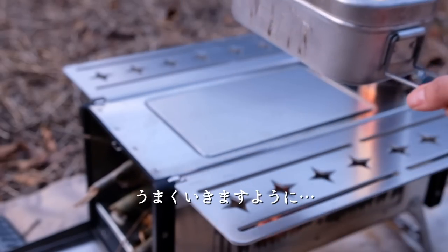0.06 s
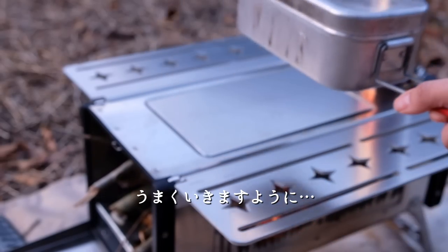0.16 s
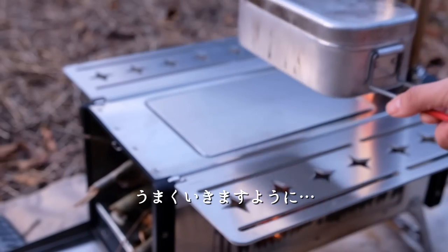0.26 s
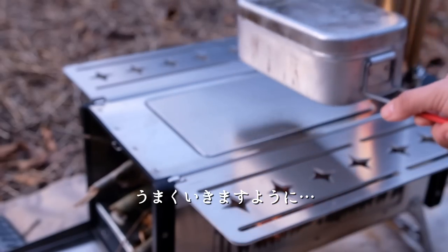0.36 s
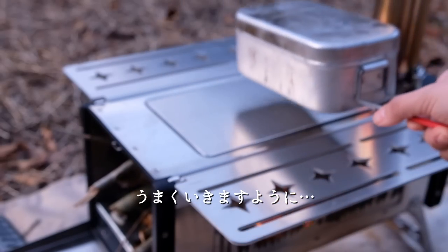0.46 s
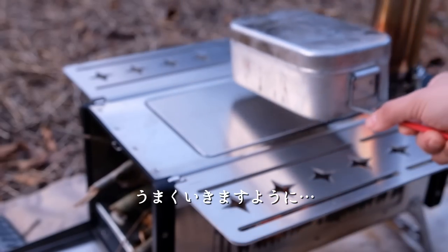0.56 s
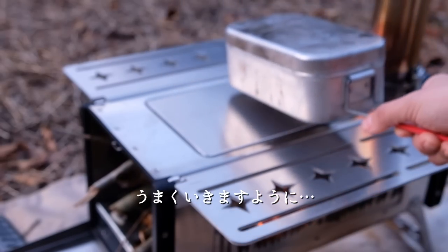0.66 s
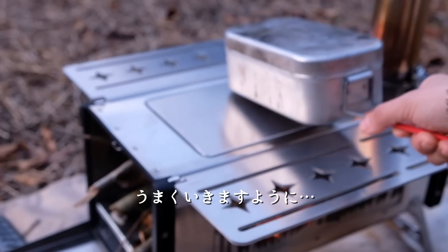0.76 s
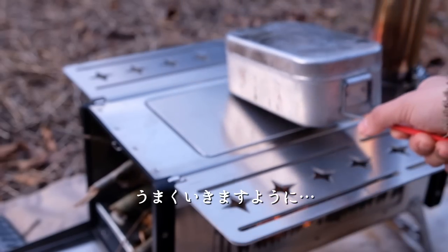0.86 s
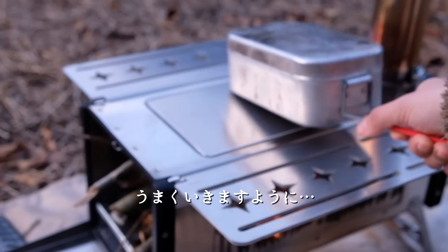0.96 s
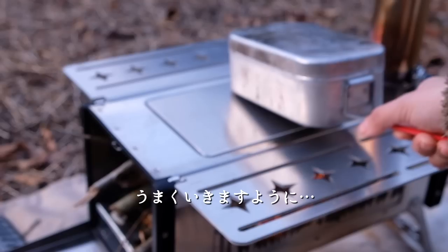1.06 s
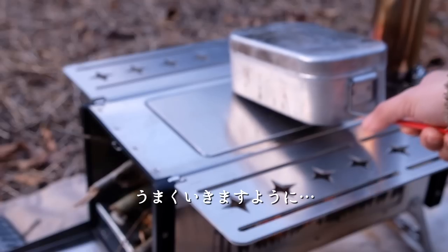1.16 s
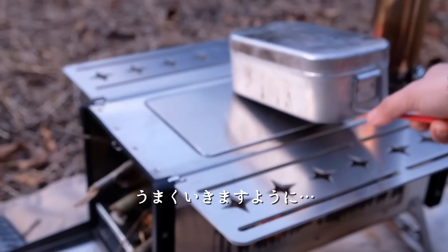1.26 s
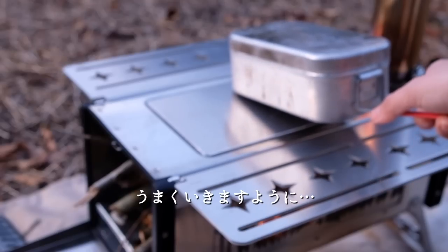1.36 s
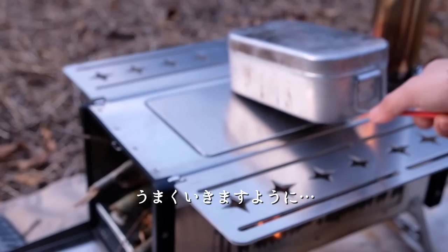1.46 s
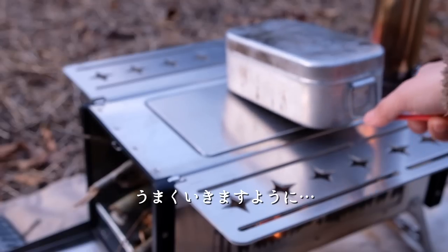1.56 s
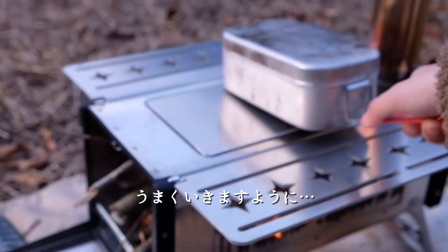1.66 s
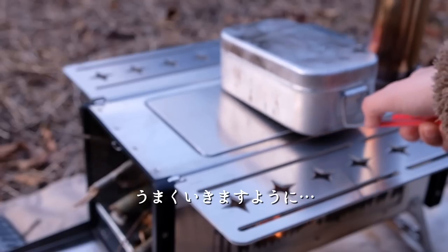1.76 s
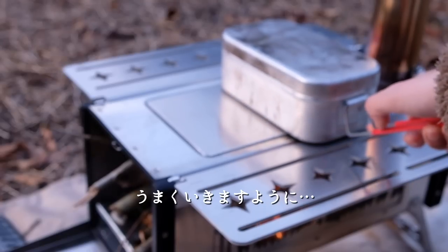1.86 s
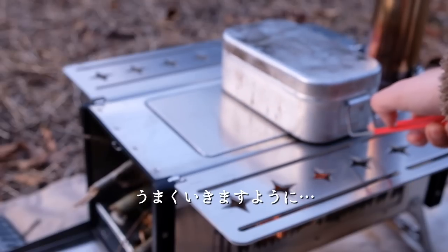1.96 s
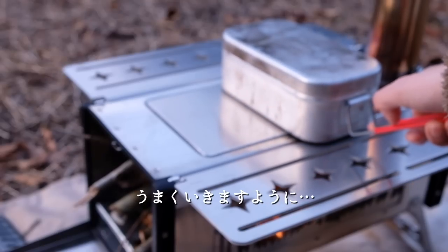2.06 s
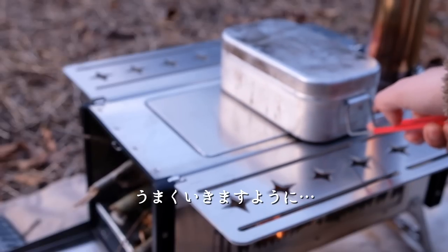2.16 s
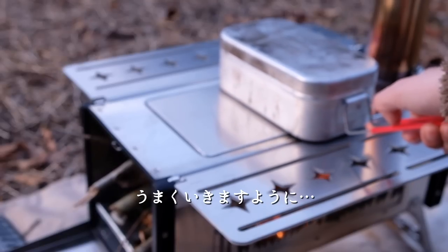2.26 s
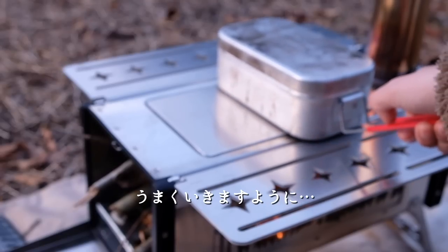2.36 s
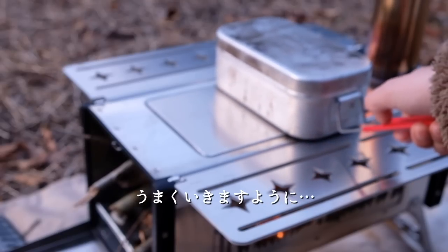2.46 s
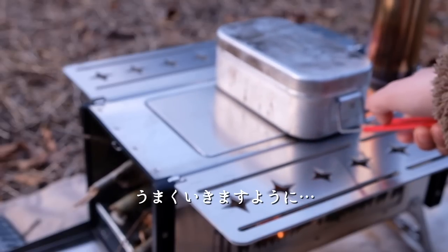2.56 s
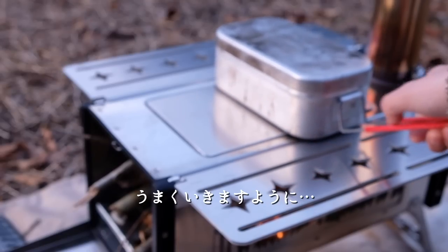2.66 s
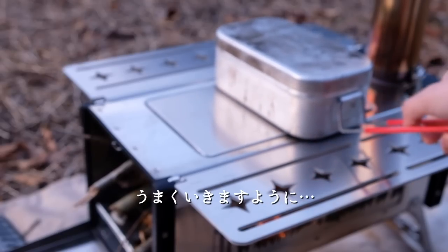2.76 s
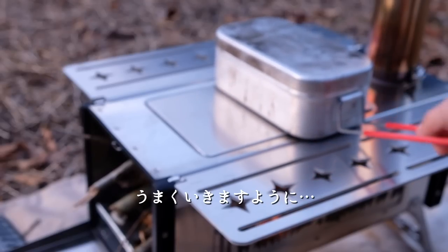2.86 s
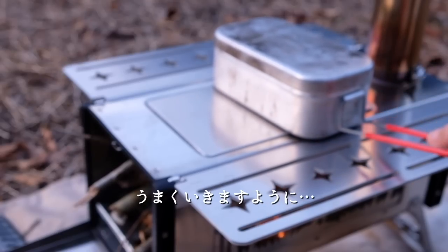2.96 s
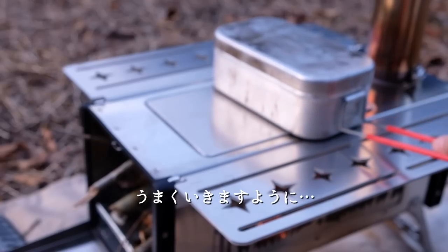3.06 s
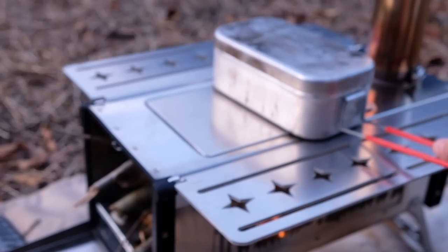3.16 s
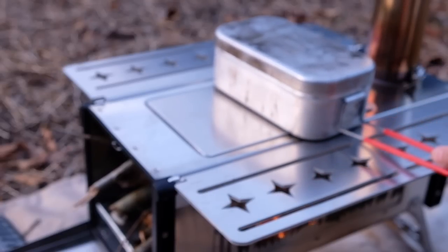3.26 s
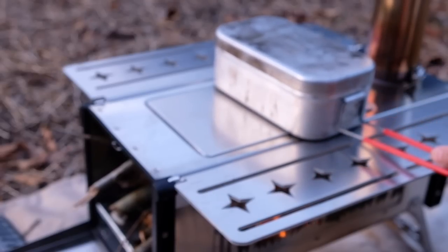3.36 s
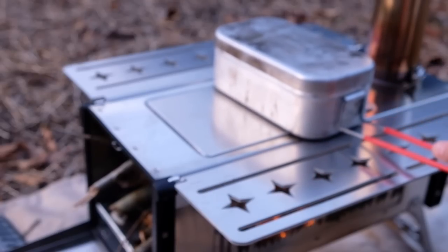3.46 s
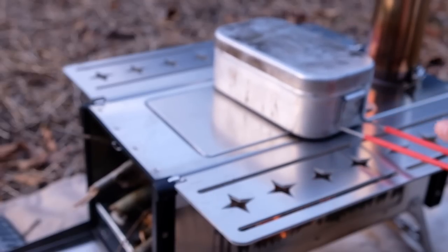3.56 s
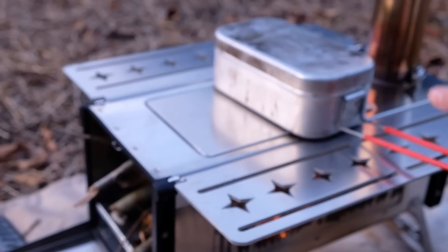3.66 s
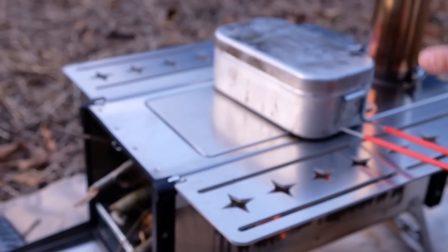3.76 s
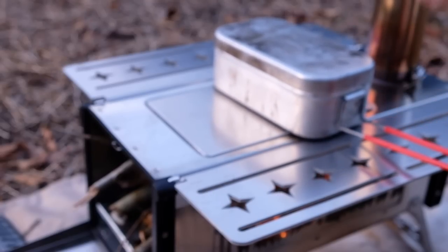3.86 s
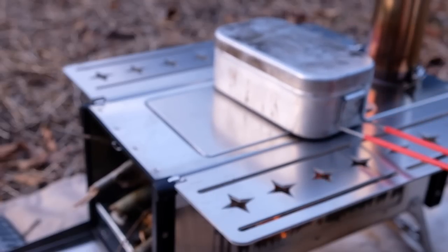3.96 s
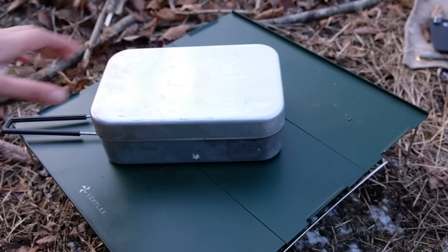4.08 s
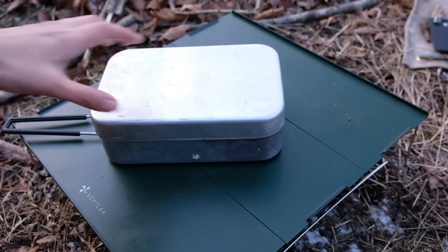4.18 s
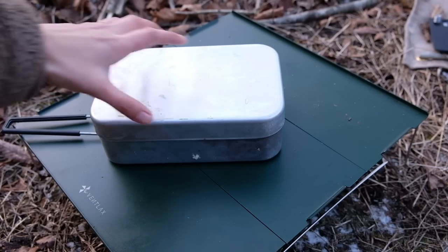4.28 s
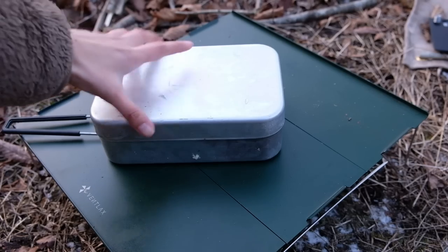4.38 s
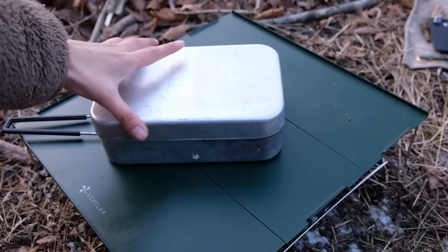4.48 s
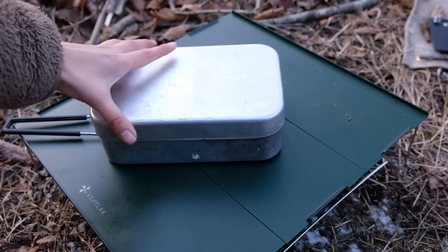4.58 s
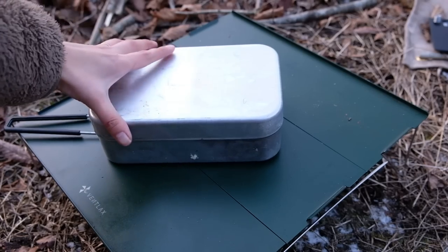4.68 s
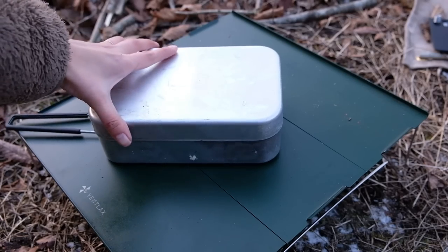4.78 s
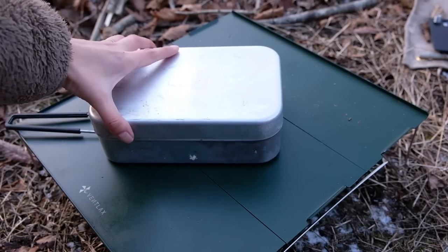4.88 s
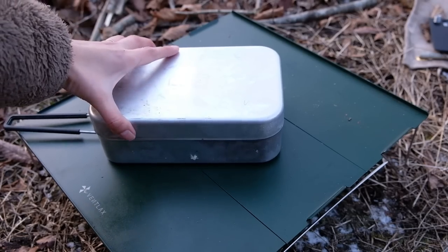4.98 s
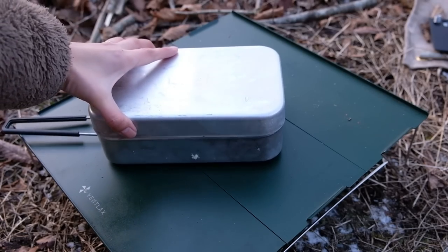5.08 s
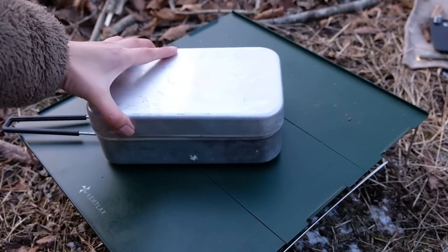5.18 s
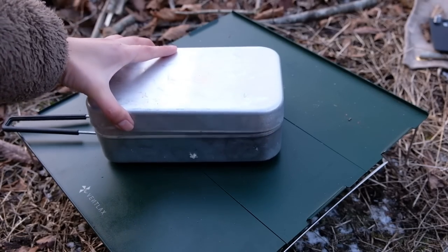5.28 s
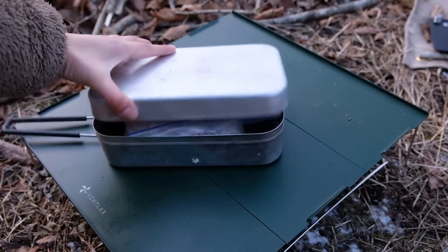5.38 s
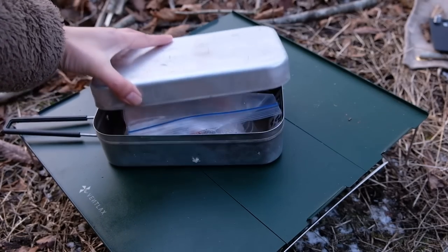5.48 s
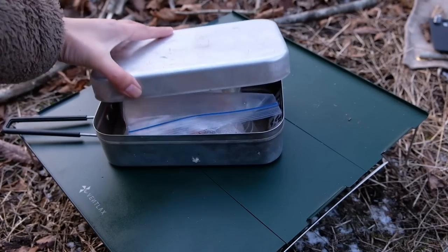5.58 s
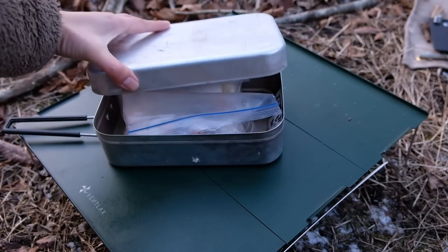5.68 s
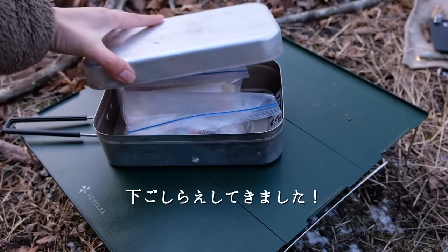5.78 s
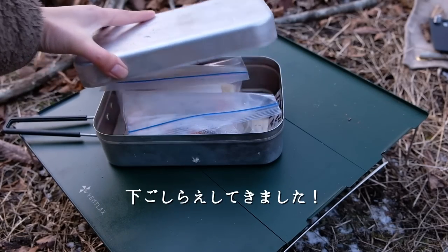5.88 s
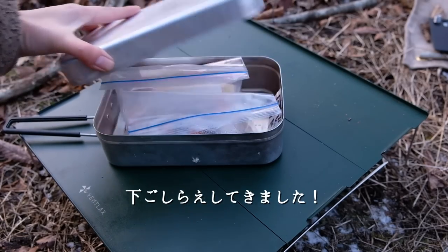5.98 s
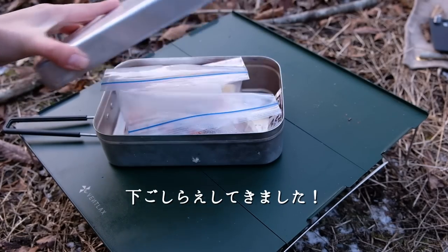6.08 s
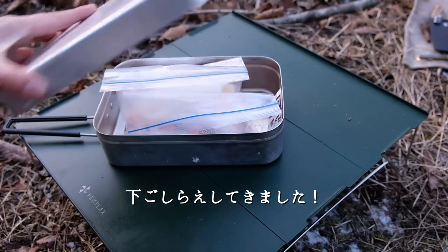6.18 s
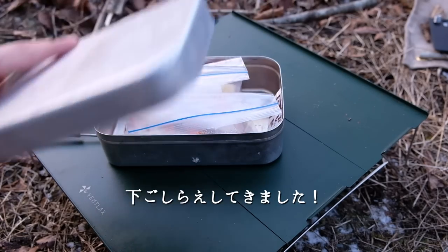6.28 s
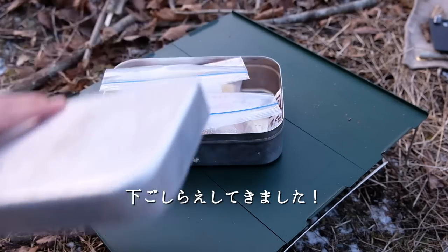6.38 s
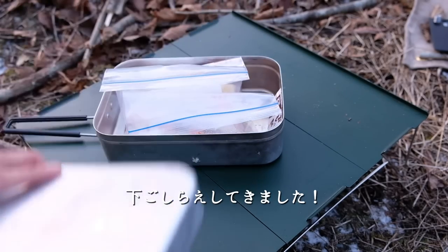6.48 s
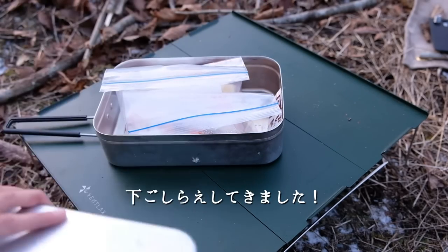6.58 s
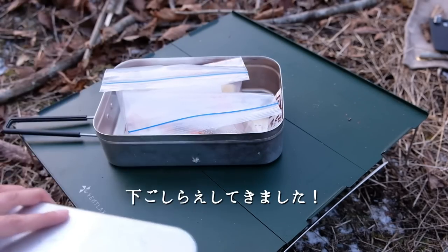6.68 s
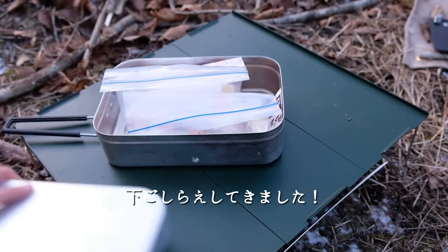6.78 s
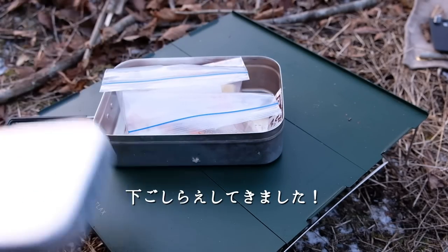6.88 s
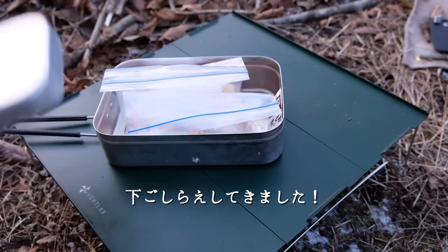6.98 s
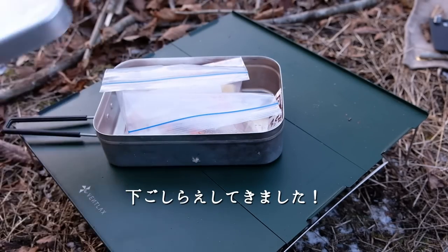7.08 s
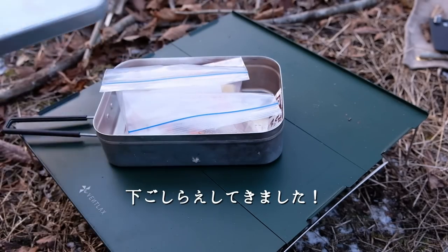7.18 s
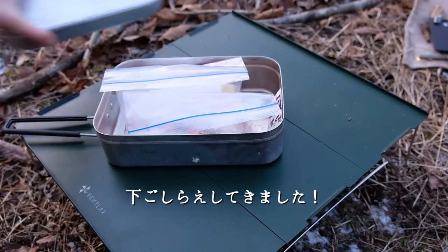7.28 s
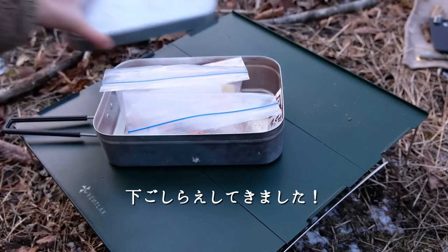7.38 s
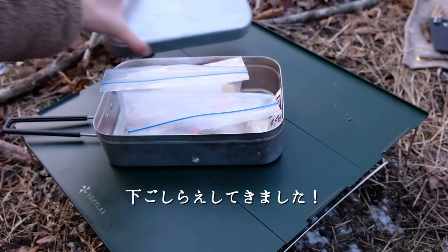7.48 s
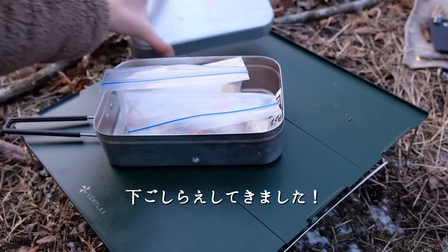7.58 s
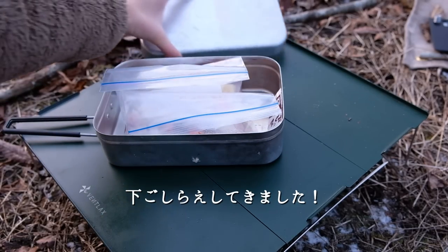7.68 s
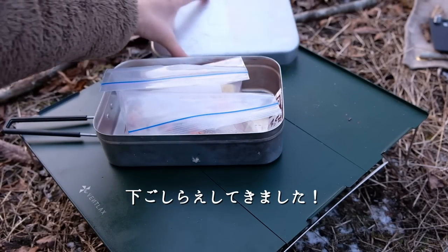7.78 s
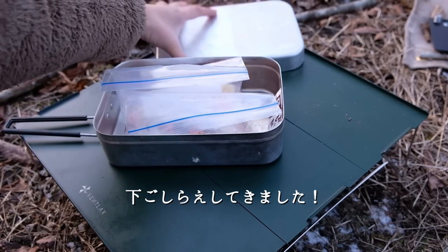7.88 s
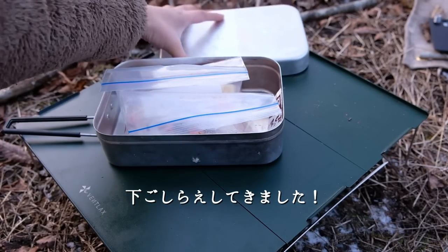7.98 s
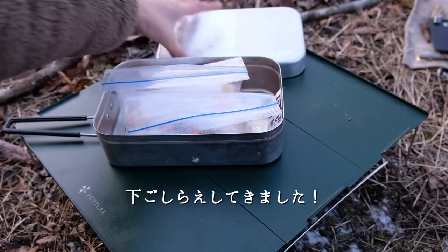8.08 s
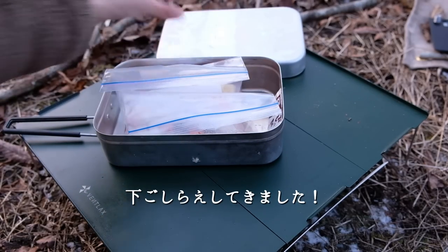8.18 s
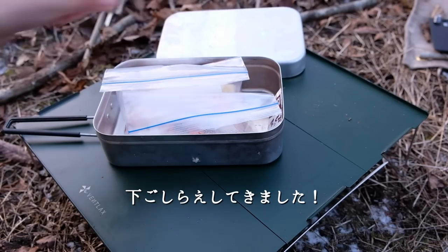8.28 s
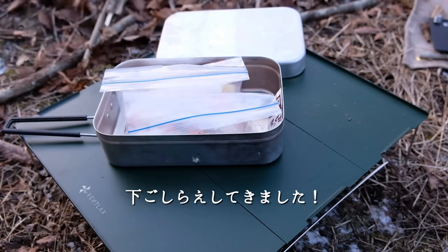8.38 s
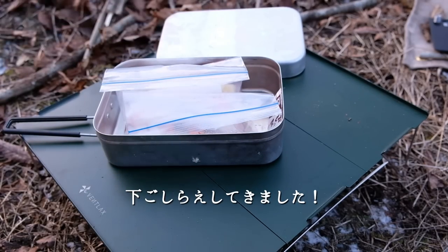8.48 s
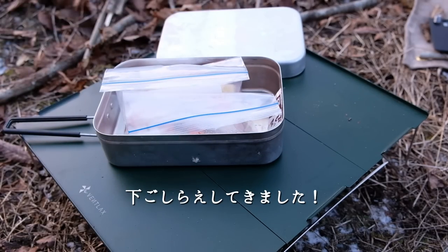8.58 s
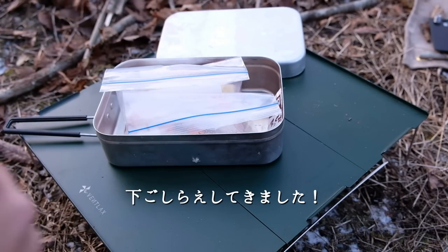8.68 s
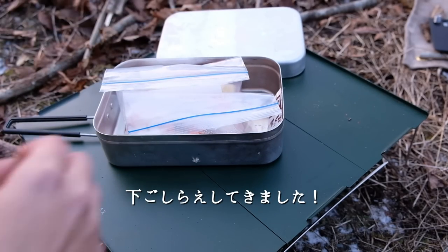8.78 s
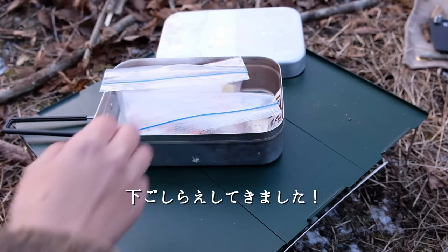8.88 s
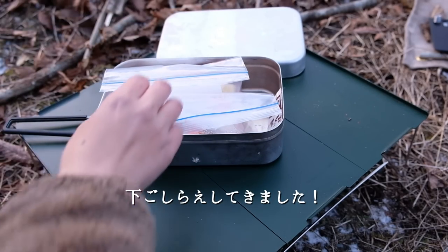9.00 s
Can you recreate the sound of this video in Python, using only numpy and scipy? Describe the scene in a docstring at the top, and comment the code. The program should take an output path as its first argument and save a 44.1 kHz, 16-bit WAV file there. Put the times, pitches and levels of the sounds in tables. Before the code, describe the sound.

An aluminium camp pot clatters and scrapes onto a steel stove, then its lid is tapped, prised off with a hollow rattle and set down outdoors.

```python
"""Outdoors, an aluminium camp pot is knocked onto a steel wood stove, slid, let down and rocks to rest.
Ringing modes and noise make the blows, random slips the sliding; very faint treble bands waver until 4.1 s.
From 4.1 s, beside a folding table, fingers tap and rub the lid (noise), prise it up, and it rattles hollowly.
Firewood snaps (noise bursts) before the lid bumps, is set down and dragged to rest, and once more after.
A fleece sleeve rustles at 4.4 s, 7.3 s and near the end; filtered noise is the air and its puffs throughout."""
import sys
import numpy as np
from scipy import signal
from scipy.fft import rfft, irfft, next_fast_len
from scipy.io import wavfile
from scipy.ndimage import map_coordinates

SR = 44100
rng = np.random.default_rng(int(sys.argv[2]) if len(sys.argv) > 2 else 0)


def transcribe(signal):
    """Save signal, clipped to [-1, 1], as a 16-bit WAV file at the path in sys.argv[1]."""
    frames = np.atleast_2d(signal).T
    limited = np.clip(frames, -1, 1)
    pcm = np.round(limited * 32767).astype(np.int16)
    wavfile.write(sys.argv[1], SR, pcm)


N = 398663
TIME = np.arange(N) / SR
RING_TIME = TIME[:SR // 2]  # each blow is computed for half a second
MOVE_S = 4.1  # the place passes from stove to table
PRISE_S, LIFT_S, SET_DOWN_S = 5.3, 6, 7  # the lid is prised up, lifted clear, then brought down to the table
SIXTY_DB = np.log(1000)  # exp(-SIXTY_DB) is a fall of 60 dB

# pot and wire handle meeting the stove:
# (time [s], strength [dB], hardness [dB per octave], extra thud from the weight behind it [dB])
POT_BLOWS = [(0.847, -25, 0, -7.5), (0.86, -36.5, 2.5, 5), (0.867, -32.5, 2.5, -22),
             (0.878, -38.5, 3.5, -1), (1.386, -58, 6.5, -4), (1.857, -32, 5, -21), (1.867, -27.5, 2, -16),
             (2.138, -47.5, 3, 9), (2.397, -53.5, 7.5, 11), (2.518, -70, 11, -6), (2.564, -61, -5.5, 2),
             (3.229, -55, -2, 1), (3.454, -45, 0.5, -2.5), (3.468, -47, 0, 0.5)]
# the pot's landing: (strength [dB], hardness [dB per octave], extra thud [dB])
LANDING = (-29.5, 1, 0.5)
# clear modes of the pot standing on the steel plate: (frequency [Hz], relative level [dB], time to fall 60 dB [s])
STOVE_MODES = [(166.7, -5.5, 0.25), (242.4, -1, 0.21), (350, -2, 0.22), (722, 5, 0.15), (800, 1, 0.13),
               (1065, -2, 0.18), (1775, -0.5, 0.13), (2555, 3, 0.093), (2927, 2.5, 0.12), (3260, 4, 0.1),
               (3570, 1.5, 0.12), (4270, 0.5, 0.16), (4830, -3.5, 0.1), (5550, -18, 0.16)]
# crowd of weaker modes of pot and plate: (frequency [Hz], relative level [dB])
STOVE_WASH = [(110, -3), (200, -4), (500, -3.5), (900, -7), (3800, 4.5), (6500, -8.5), (8500, -22.5),
              (15000, -31.5)]
# how long that crowd rings, before scaling: (frequency [Hz], time to fall 60 dB [s])
STOVE_DECAY = [(200, 0.38), (3000, 0.095), (9000, 0.12)]
# pot's clank, thud, ring and tick in a blow of hardness 0, relative to its strength: (level [dB])
POT_VOICE_DB = [-2, -3, -5, -21]
# how alike left and right are for metal and wood: (frequency [Hz], likeness [-1 to 1])
METAL_ALIKE = [(800, 0.99), (4000, 0.97), (10000, 0.29)]


def pot_blows():
    """The pot clatters on the stove and its handle clicks: ringing modes plus a brief contact burst."""
    out = np.zeros((2, N))
    for s, strength_db, hardness, weight_db in POT_BLOWS + rocking(count=3):
        clear = tones(STOVE_MODES, freedom=1, scatter_db=2.5)
        ring = amp(-13.5) * clear + wash(STOVE_WASH, STOVE_DECAY, freedom=0.97)
        # the steel plate rings on faintly
        shimmer = amp(-29.0) * wash(STOVE_WASH, STOVE_DECAY, freedom=7.9)
        singing = amp(-46) * tones(STOVE_MODES, freedom=6, scatter_db=2)
        contact = amp(9.0) * crack(STOVE_WASH, t60=0.014)
        sound = stereo(ring + shimmer + singing + contact, METAL_ALIKE, left_db=1.5)
        levels_db = register_levels(POT_VOICE_DB, strength_db, hardness, weight_db)
        add(out, s, voiced(sound, levels_db))
    return out


# the pot's edge sliding on steel: (start [s], end [s], level [dB])
SLIDES = [(0.83, 0.846, -55.5), (0.92, 1.059, -54), (1.41, 1.449, -55.5), (1.486, 1.528, -52),
          (1.605, 1.85, -43.5), (1.848, 1.878, -29.5), (2.243, 2.5, -66)]
# hiss of the edge touching lightly: (frequency [Hz], relative level [dB])
EDGE_COLOUR = [(300, -20.5), (1280, -9), (3300, 1.5), (3950, -9), (4500, -0.5), (5700, 2), (7900, -6.5),
               (12700, -8.5), (15500, -14.5)]
# grinding of the edge when leaned on: (frequency [Hz], relative level [dB])
GRIND_COLOUR = [(400, -37), (750, -17), (1400, -11), (3300, 5.5), (4400, 4.5), (7000, -6.5), (8500, -43),
                (15000, -50.5)]
BITE_DB = -40.5  # pressure at which hiss and grind share equally


def pot_slides():
    """A light edge only hisses over the steel; leaned on, it bites, grinds and sets the metal singing."""
    pressure = strokes(SLIDES, rise=0.2, swell_db=4.5, release_s=0.02)
    bite = pressure ** 2 / (pressure ** 2 + amp(BITE_DB) ** 2)
    light, heavy = pressure * np.sqrt(1 - bite), pressure * np.sqrt(bite)
    modes = standing_out(STOVE_MODES, STOVE_WASH)
    hiss = friction(light, modes, EDGE_COLOUR, rate=3300, grit_db=1.5, ring_db=-15.0)
    grind = friction(heavy, modes, GRIND_COLOUR, rate=2500, grit_db=3, ring_db=-1)
    return stereo(hiss + grind, METAL_ALIKE, left_db=0.3)


# lid against fingers, pot and table: (time [s], strength [dB], hardness [dB per octave])
LID_BLOWS = [(4.467, -57.5, 0), (4.634, -37, 0), (4.749, -64.5, 6.5), (4.836, -49.5, -3),
             (4.925, -57, -1.5), (4.989, -56, -8), (5.072, -50.5, 0.5), (5.367, -31.5, 1),
             (5.397, -27.5, 0), (5.399, -37.5, -8.5), (5.435, -47.5, -9), (5.451, -37, -4.5),
             (5.466, -37, -0.5), (5.486, -45, -1), (5.508, -50.5, 0), (5.557, -56, -2.5),
             (6.692, -25.5, 0.5), (5.617, -57, 1.5), (7.715, -22, -0.5), (7.763, -34.5, -4),
             (7.876, -36, -6.5), (7.905, -34.5, 2.5), (7.912, -26.5, -3.5), (7.972, -49.5, 9.5),
             (8.419, -60, -8), (8.531, -55.5, -7.5), (8.558, -73, 9)]
# how freely the damping hand lets the lid ring: (time [s], share of the free ring time)
LID_FREEDOM = [(5.1, 0.36), (5.4, 0.63), (6.7, 0.6), (7.85, 0.92), (8.0, 0.12)]
# clear modes of the lid, before damping by hand or table:
# (frequency [Hz], relative level in the hand [dB], relative level on the table [dB], time to fall 60 dB [s])
LID_MODES = [(268, 7.5, -8.5, 0.23), (384.4, 7, 0.5, 0.36), (541, -5.5, -0.5, 0.19), (714, -14, -10, 0.16),
             (989, -19, -15.5, 0.35), (1194, -12, -10, 0.22), (1329, -23, -16, 0.31),
             (1550, 10, -12, 0.063), (1715, -1.5, -15.5, 0.23), (1831, -4.5, -8.5, 0.18),
             (2060, -1, -19, 0.087), (2369, -8, -8.5, 0.27), (2414, -26, -11, 0.12),
             (2880, -17, -5.5, 0.16), (3370, -8, -20, 0.13), (3520, -29, -11, 0.17), (4150, -16, -9, 0.14),
             (4840, -12, -10.5, 0.057), (5437, -24, -15.5, 0.095)]
# lid and pot rattling together, before damping: (frequency [Hz], relative level [dB], time to fall 60 dB [s])
CLOSED_MODES = [(512, 8, 0.054), (1655, 9.5, 0.021), (2940, 3.5, 0.047), (3190, -3.5, 0.054),
                (4240, -8, 0.05), (5200, -15, 0.054), (7920, -14, 0.033)]
# crowd of weaker modes of the lid held in the air: (frequency [Hz], relative level [dB])
HELD_WASH = [(100, -19), (280, -20), (600, 13), (1000, 4.5), (1600, 5.5), (3200, -5), (15000, -60)]
# the same crowd with the lid on pot or table: (frequency [Hz], relative level [dB])
LID_WASH = [(100, -42), (300, 4.5), (520, 7.5), (1000, 0), (1700, -5.5), (3200, -6), (9000, -22),
            (15000, -32)]
# how long the crowd rings, before damping: (frequency [Hz], time to fall 60 dB [s])
LID_DECAY = [(200, 0.076), (3000, 0.22), (9000, 0.11)]
# lid's clank, thud, ring and tick in a blow of hardness 0, relative to its strength: (level [dB])
LID_VOICE_DB = [-2.5, -5.5, -8, -24.5]


def lid_blows():
    """Fingers tap the lid; it rattles hollowly in the pot's mouth as it is prised up, and rings once off."""
    out = np.zeros((2, N))
    for s, strength_db, hardness in LID_BLOWS:
        freedom = max(curve(LID_FREEDOM, s), .1)
        crowd = HELD_WASH if LIFT_S < s < SET_DOWN_S else LID_WASH
        modes = CLOSED_MODES if PRISE_S < s < LIFT_S else lid_modes(held=s < SET_DOWN_S)
        clear = tones(modes, freedom, scatter_db=2.5)
        ring = clear + wash(crowd, LID_DECAY, freedom)
        contact = amp(12) * crack(crowd, t60=0.014)
        sound = stereo(ring + contact, METAL_ALIKE, left_db=2.5)
        add(out, s, voiced(sound, register_levels(LID_VOICE_DB, strength_db, hardness)))
    return out


# the lid rubbing on the pot's rim, then dragged over the table: (start [s], end [s], level [dB])
DRAGS = [(4.68, 4.755, -49), (5.345, 5.42, -38), (7.718, 7.882, -29.5), (7.902, 7.94, -27.5),
         (7.95, 8.03, -45), (8.02, 8.085, -35.5)]
# colour of the rubbing: (frequency [Hz], relative level [dB])
DRAG_COLOUR = [(100, -31), (210, -13.5), (360, -0.5), (560, -2), (850, -3.5), (1700, -12.5), (3200, -24),
               (6500, -38), (15000, -53)]


def lid_drag():
    """The rim judders along in coarse slips; it rings while loose and rasps dryly under the hand's weight."""
    force = strokes(DRAGS, rise=0.5, swell_db=-2, release_s=0.093)
    force = force * amp(1.4 * wobble(90))  # judder
    loose = np.clip(curve(LID_FREEDOM), 0, 1) ** 2 * (TIME > LIFT_S)
    pressed = np.sqrt(1 - loose ** 2)
    modes = standing_out(lid_modes(held=False), LID_WASH)
    ringing = friction(force * loose, modes, DRAG_COLOUR, rate=1800, grit_db=2.0, ring_db=2)
    dry_rasp = friction(force * pressed, modes, DRAG_COLOUR, rate=1800, grit_db=2.0, ring_db=-12.5)
    return stereo(ringing + dry_rasp, METAL_ALIKE, left_db=2.0)


def grip():
    """Fingers rub dully on the lid as they search for a hold: low noise in one unsteady swell."""
    rub = coloured(rng.standard_normal(N), [(80, -10.0), (230, -1.0), (700, -8.5), (3000, -45.0)])
    swell = np.exp(-((TIME - 5.15) / 0.41) ** 2)
    return amp(-56 + 0.81 * wobble(44)) * swell * rub


# firewood snapping off to the right: (time [s], strength [dB], hardness [dB per octave])
SNAPS = [(6.38, -34.5, 0.5), (8.471, -56.5, 4.5)]
# colour of splitting wood: (frequency [Hz], relative level [dB])
SNAP_COLOUR = [(150, 10.5), (1000, -9.5), (1600, 6), (2600, -10), (5000, 1.5), (15000, -26)]
# snap's clank, thud, ring and tick bands at hardness 0, relative to its strength: (level [dB])
SNAP_VOICE_DB = [-2, -12, 2.5, -9]


def snaps():
    """Dry noise bursts that reach the right ear first and echo faintly from the trees."""
    out = np.zeros((2, N))
    for s, strength_db, hardness in SNAPS:
        burst = stereo(crack(SNAP_COLOUR, t60=0.026), METAL_ALIKE, left_db=-0.5)
        direct = voiced(burst, register_levels(SNAP_VOICE_DB, strength_db, hardness))
        echo = amp(-8.5) * np.std(direct) * crack(SNAP_COLOUR, t60=0.19)
        add(out, s, direct)
        add(out, s + 0.041, echo)
    return np.array([np.roll(out[0], 4), out[1]])  # the left ear hears it 4 samples later


# reaches of the arm in its fleece sleeve: (time [s], half-length [s], level [dB])
REACHES = [(4.38, 0.29, -63.5), (7.33, 0.2, -61.5), (8.72, 0.068, -54), (8.95, 0.88, -54.5)]
# colour of the rustle: (frequency [Hz], relative level [dB])
SLEEVE_COLOUR = [(71, -24.5), (120, -6), (770, -9.5), (2690, -21), (7700, -30.5), (15000, -42)]


def sleeve():
    """Fleece brushes by, close on the left, as the arm reaches: soft noise with a trembling level."""
    fibres = coloured(rng.standard_normal((2, N)), SLEEVE_COLOUR)
    rustle = stereo(fibres, [(300, 0.68), (1500, 0.4), (4000, -0.43)], left_db=2.5)
    return swells(REACHES, rest_db=-65.5) * amp(1.26 * wobble(25)) * rustle


def treble_bands():
    """Very faint, narrow bands of noise waver near 5.7 and 9.5 kHz until 4.1 s: sines at random strength."""
    bands = np.zeros(N)
    for centre_hz in (5730, 9500):
        wander = 1 + 0.05 * wobble(7)  # spread as a share of the centre frequency
        phase = 2 * np.pi * np.cumsum(centre_hz * wander) / SR
        bands += amp(6 * wobble(8)) * wobble(500) * np.sin(phase)
    return amp(-87) * unit(bands) * (TIME < MOVE_S)


# hush beside the stove: (frequency [Hz], relative level [dB])
STOVE_AIR = [(15, -24), (25, -1), (164, -4.5), (700, -9.5), (1050, -15), (15500, -36.5)]
# hush beside the table: (frequency [Hz], relative level [dB])
TABLE_AIR = [(15, -48), (25, -13.5), (240, -4.5), (509, -9), (13900, -42), (15500, -86)]
# how alike the hush is left and right: (frequency [Hz], likeness [-1 to 1])
AIR_ALIKE = [(40, 0.4), (200, 0.57), (4000, 0.47)]
# puffs of air on the microphone: (time [s], half-length [s], level before flutter [dB])
PUFFS = [(.27, 0.18, -55), (1.32, 0.048, -62.5), (2.185, 0.04, -46.5), (3.45, 0.054, -51)]
# colour of the puffs: (frequency [Hz], relative level [dB])
PUFF_COLOUR = [(20, -33), (55, 3.5), (180, 1), (300, -9.5), (1500, -81)]


def air():
    """A quiet outdoor hush of noise, with low fluttering puffs that differ between the microphone's ports."""
    moved = np.clip((TIME - MOVE_S) * 10 + .5, 0, 1)  # passes from stove to table in 0.1 s
    by_stove = amp(-64.0) * coloured(rng.standard_normal((2, N)), STOVE_AIR)
    by_table = amp(-64.0) * coloured(rng.standard_normal((2, N)), TABLE_AIR)
    hush = stereo(np.sqrt(1 - moved) * by_stove + np.sqrt(moved) * by_table, AIR_ALIKE, left_db=0.0)
    rumble = stereo(coloured(rng.standard_normal((2, N)), PUFF_COLOUR), [(100, 0.3)], left_db=6.5)
    flutter = unit(amp(5 * wobble(35)))
    puffs = swells(PUFFS, rest_db=-72.5) * flutter * rumble  # a faint draught remains between puffs
    return hush * amp(1.5 * wobble(20.0)) + puffs


def rocking(count):
    """The pot's landing and its rebounds, each sooner, weaker and brighter than the last."""
    strength_db, hardness, weight_db = LANDING
    gaps = 0.033 * 0.8 ** np.arange(count)  # first gap [s], each gap over the last
    times = [1.895 + gaps[:k].sum() for k in range(count)]
    return [(s, strength_db - 10.5 * k, hardness + k, weight_db) for k, s in enumerate(times)]


def lid_modes(held):
    """In the hand the lid rings freely; lying on the table, its low modes are damped."""
    if held:
        return [(hz, db, t60) for hz, db, _, t60 in LID_MODES]
    return [(hz, db, t60 * hz / (hz + 450)) for hz, _, db, t60 in LID_MODES]


def standing_out(modes, spectrum):
    """Mode levels relative to the crowd of weaker modes around them."""
    return [(hz, db - along(spectrum, hz), t60) for hz, db, t60 in modes]


def tones(modes, freedom, scatter_db):
    """Clear modes as dying sines, with newly drawn strengths for each contact and channel."""
    hz, db, t60 = np.transpose(modes)[:, :, None]
    level_db = db + scatter_db * rng.standard_normal((2, len(modes), 1))
    size = amp(level_db) * rng.choice([-1, 1], level_db.shape)
    decay = amp(-60 * RING_TIME / (t60 * freedom))
    return size[..., 0] @ (decay * np.sin(2 * np.pi * hz * RING_TIME))


def wash(spectrum, decay, freedom):
    """Crowded modes: noise in which each frequency dies at its own speed."""
    noise = coloured(rng.standard_normal((2, len(RING_TIME))), spectrum)
    hz, t, z = signal.stft(noise, SR, nperseg=128)
    t60 = freedom * along(decay, hz)[:, None]
    return signal.istft(z * amp(-60 * t / t60), SR, nperseg=128)[1][:, :len(RING_TIME)]


def crack(spectrum, t60):
    """The burst of the contact itself: noise that falls 60 dB in t60 seconds."""
    noise = coloured(rng.standard_normal((2, len(RING_TIME))), spectrum)
    return noise * np.exp(-SIXTY_DB * RING_TIME / t60)


# clank, thud, ring and tick: (low edge [Hz], high edge [Hz])
REGISTERS = [(600, 2200), (130, 600), (2200, 7000), (7000, 15500)]


def register_levels(voice_db, strength_db, hardness, weight_db=0):
    """A harder contact tilts the body's voice towards the treble; weight behind it adds thud."""
    octaves = np.log2(REGISTERS).mean(axis=1)
    thud = octaves == octaves.min()
    tilt_db = hardness * (octaves - octaves[0])
    return strength_db + np.array(voice_db) + tilt_db + weight_db * thud


def voiced(sound, levels_db):
    """Soft contacts thud and hard ones tick: each register starts at its own level."""
    out = np.zeros_like(sound)
    sound = sound * (1 - np.exp(-RING_TIME / 0.00041))  # the contact takes a moment to build
    for (lo, hi), db in zip(REGISTERS, levels_db):
        bandpass = signal.butter(3, [lo, hi], "bandpass", fs=SR, output="sos")
        band = signal.sosfilt(bandpass, sound)
        out += amp(db) * band / np.std(band[:, :SR // 100])  # level over the first 10 ms
    return out


def strokes(rows, rise, swell_db, release_s):
    """Rubbing force: each stroke rises over a share of its length, drifts by swell_db, then dies away."""
    force = np.zeros(N)
    for start, end, db in rows:
        progress = np.clip((TIME - start) / max(end - start, .005), 0, 1)
        release = np.exp(-SIXTY_DB * np.maximum(TIME - end, 0) / release_s)
        force += np.minimum(progress / rise, 1) * amp(db + swell_db * (progress - .5)) * release
    return force


def friction(force, modes, spectrum, rate, grit_db, ring_db):
    """Tiny slips of uneven size, about rate a second, heard directly and through the body's modes."""
    happens = rng.random(N) < rate / SR
    sizes = happens * amp(grit_db * np.clip(rng.standard_normal(N), -2, 2))
    slips = force * sizes * rng.choice([-1, 1], (2, N))
    rung = signal.fftconvolve(slips, tones(modes, freedom=.7, scatter_db=1), axes=1)[:, :N]
    blend = unit(slips) + amp(ring_db) * unit(rung)
    return coloured(blend, spectrum) * np.sqrt(np.mean(force ** 2))


def swells(rows, rest_db):
    """Bell-shaped swells over a resting level, as a gain."""
    power = sum((amp(db) * np.exp(-.5 * ((TIME - s) / half_s) ** 2)) ** 2 for s, half_s, db in rows)
    return np.sqrt(power + amp(rest_db) ** 2)


def amp(db):
    """Decibels to gain."""
    return 10 ** (np.asarray(db) / 20)


def unit(x):
    """x at rms 1."""
    return x / np.sqrt(np.mean(x ** 2) + 1e-20)


def along(points, hz):
    """(frequency [Hz], value) points read on a log axis."""
    f, v = np.transpose(points)
    return np.interp(np.log(hz + 1), np.log(f + 1), v)


def curve(rows, t=TIME):
    """(time [s], value) rows joined by straight lines."""
    return np.interp(t, *np.transpose(rows))


def wobble(rate):
    """A smooth random curve, with rate random points a second."""
    return map_coordinates(rng.standard_normal(int(N * rate / SR) + 4), [TIME * rate])


def filtered(x, response):
    """x times a response of frequency."""
    m = next_fast_len(x.shape[-1] + 8192)
    return irfft(rfft(x, m) * response(np.fft.rfftfreq(m, 1 / SR)), m)[..., :x.shape[-1]]


def coloured(x, spectrum):
    """x shaped by (frequency [Hz], relative level [dB]) points, at rms 1."""
    return unit(filtered(x, lambda hz: amp(along(spectrum, hz))))


def stereo(pair, alike, left_db):
    """Two signals blended into a left and a right of given likeness and balance."""
    turn = lambda hz: np.arccos(np.clip(along(alike, hz), -1, 1)) / 2
    mid, side = filtered(pair, lambda hz: np.array([np.cos(turn(hz)), np.sin(turn(hz))]))
    return np.array([mid + side, mid - side]) * amp([[left_db / 2], [-left_db / 2]])


def add(track, s, sound):
    """Mix a sound into the track at time s."""
    part = track[:, round(s * SR):][:, :sound.shape[1]]
    part += sound[:, :part.shape[1]]


def scene():
    """Pot, lid and surroundings together."""
    pot = pot_blows() + pot_slides()
    lid = lid_blows() + lid_drag() + grip()
    return pot + lid + snaps() + sleeve() + treble_bands() + air()


def record(dry):
    """The microphone dulls the highest treble, and a steep band limit removes what lies above it."""
    dulled = filtered(dry, lambda hz: 1 / np.sqrt(1 + (hz / 13500) ** 10))
    return filtered(dulled, lambda hz: 1 / np.sqrt(1 + (hz / 15700) ** 80))


dry = scene()
out = record(dry)
transcribe(out)
```